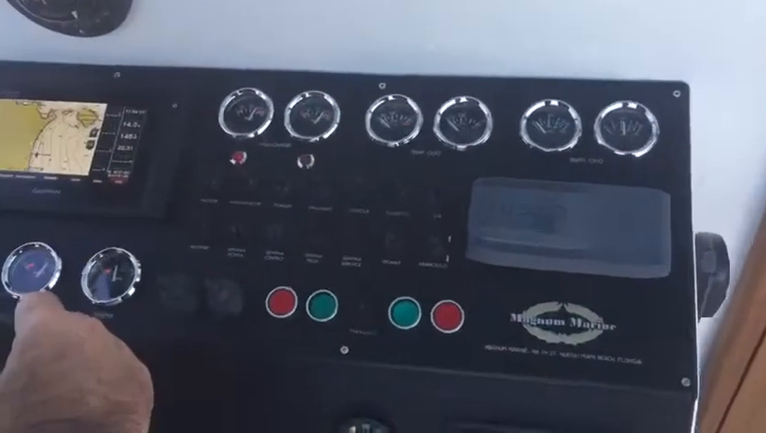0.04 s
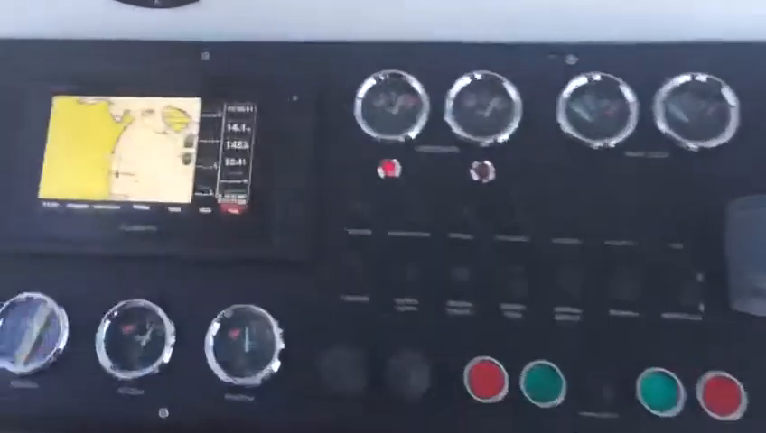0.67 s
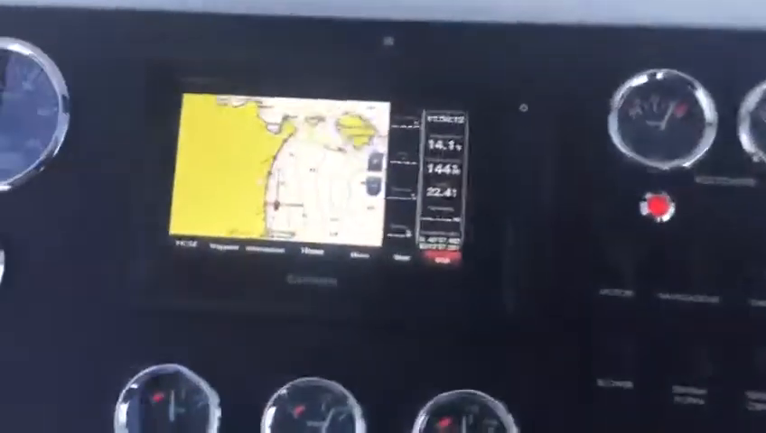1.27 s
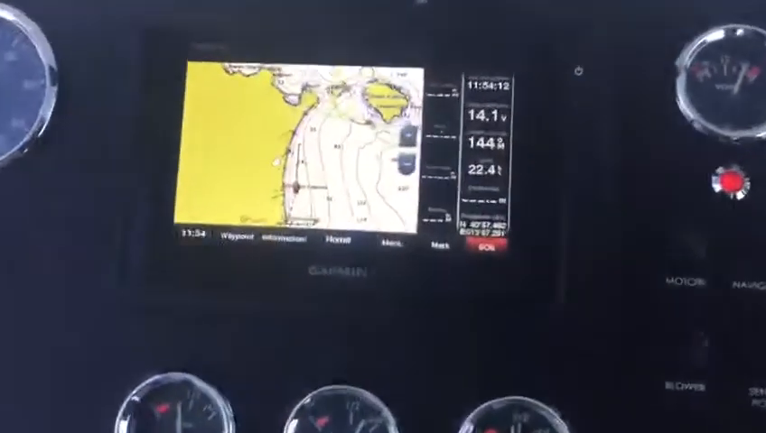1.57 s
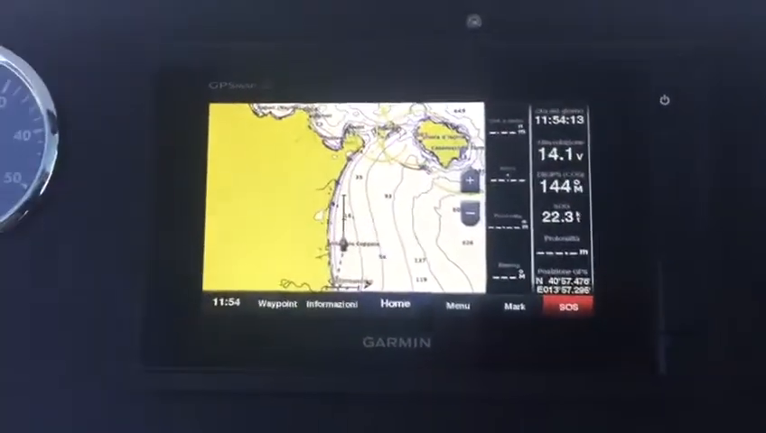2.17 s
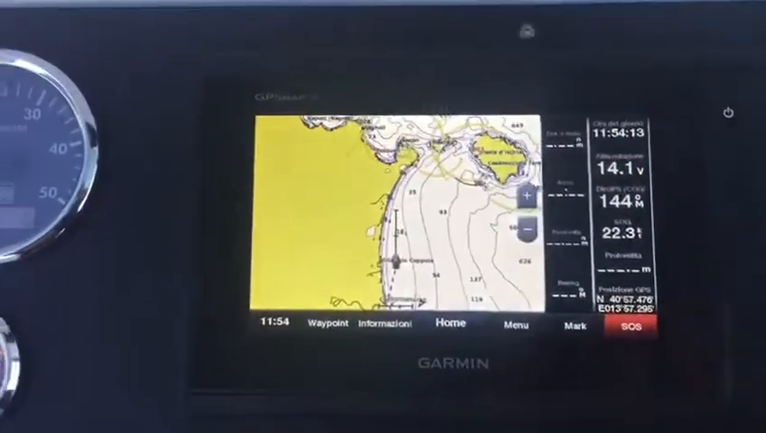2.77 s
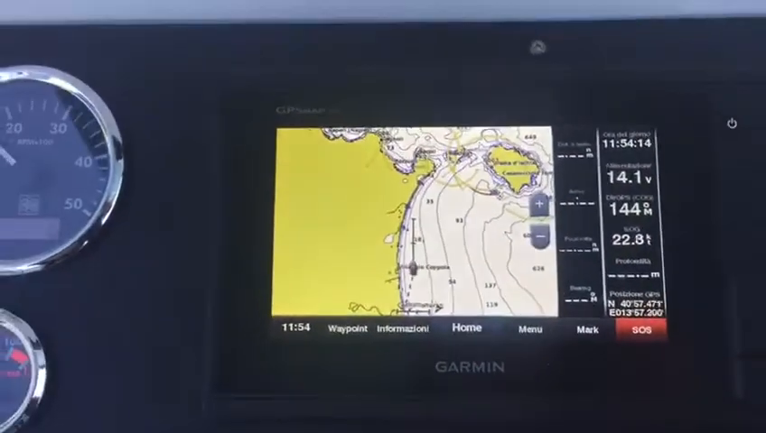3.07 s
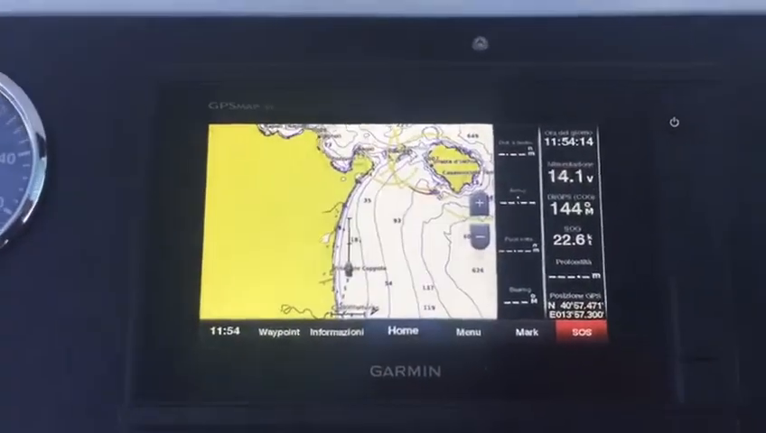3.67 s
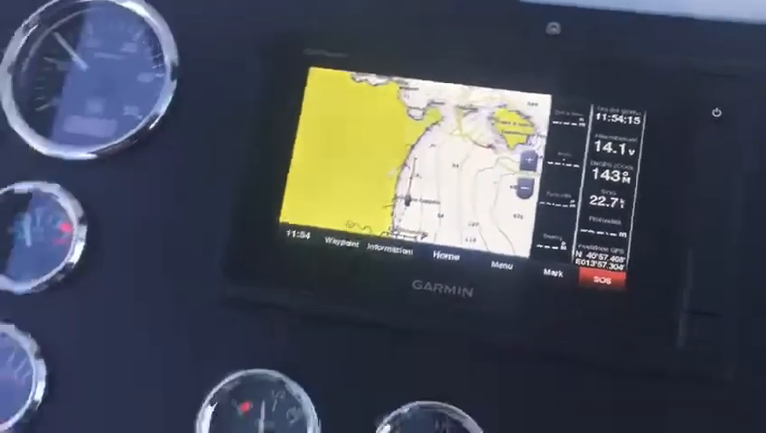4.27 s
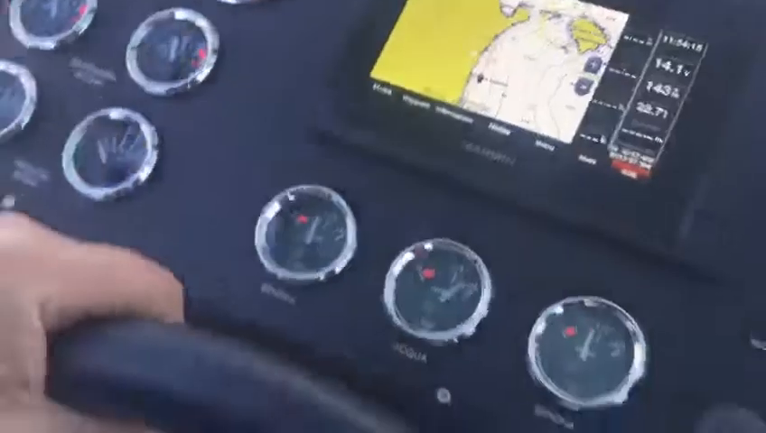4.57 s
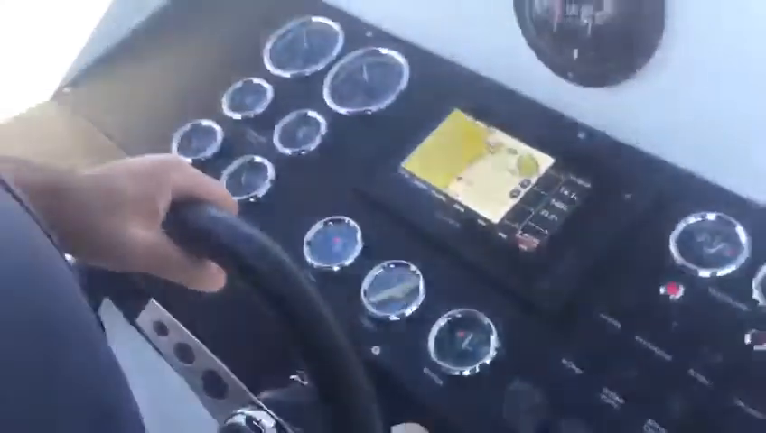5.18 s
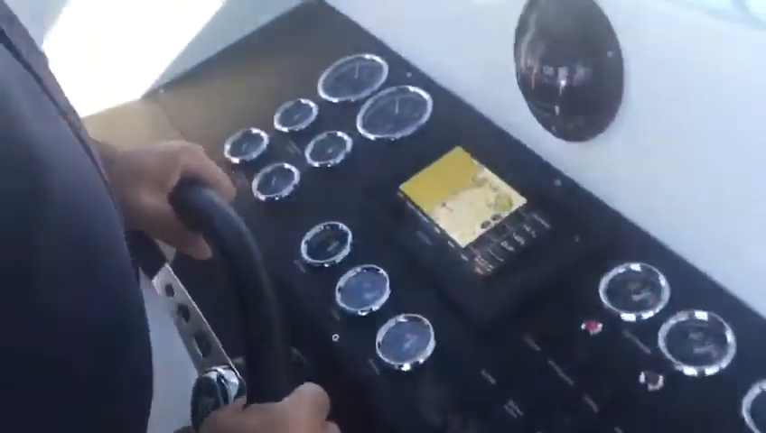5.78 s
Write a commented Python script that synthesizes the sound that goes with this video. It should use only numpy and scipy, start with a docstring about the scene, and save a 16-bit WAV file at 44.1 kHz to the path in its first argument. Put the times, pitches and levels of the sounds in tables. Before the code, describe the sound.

Heard from the helm of a cruising powerboat, two engines drone steadily and slightly out of step, with a low propeller throb and a high, wavering gear whine. Wind and spray hiss over the rumbling hull. After about a second the growl draws back and the exhaust note swells three times; near the end the growl comes forward again.

```python
"""A twin-engined powerboat cruises at about 3000 rpm, heard at the helm. From the start, propeller
blades thump the hull, reduction gears whine and two V8 exhausts drone slightly out of step over
water and wind. After a second the engine growl draws back and the exhausts surge three times,
while a long wave swells the hull's rumble. Around 4 s the engines drift nearly into step; then
their drone stands out, and near the end the thump dips twice as the growl comes forward again."""
import sys
import numpy as np
from scipy import signal
from scipy.fft import rfft, irfft, next_fast_len
from scipy.io import wavfile
from scipy.ndimage import uniform_filter1d, map_coordinates

SR = 44100
rng = np.random.default_rng(int(sys.argv[2]) if len(sys.argv) > 2 else 0)


def master(y):
    """Save y as 16-bit WAV."""
    cut = np.clip(np.atleast_2d(y).T, -1, 1)
    pcm = np.round(cut * 32767)  # scale
    wavfile.write(sys.argv[1], SR, pcm.astype(np.int16))


N = 257544
PINION_TEETH, WHEEL_TEETH, CYLINDERS = 17, 33, 8

# The engine growl's fader, lower while the listener shelters close to the dashboard.
# Each row: time in seconds, level in dB.
GROWL_FADER = [(0, -27.5), (.25, -26.5), (.7, -29.5), (1.15, -35), (2.6, -34.5), (3.4, -40), (4.2, -35.5),
               (4.85, -37), (5.25, -35), (5.55, -29), (5.84, -31.5)]


def propellers(crank):
    """Each blade passing under the hull pushes on it; unequal blades add other shaft orders."""
    # The thump's slow swell and sag. Each row: time in seconds, level in dB.
    thump_fader = [(0, -15), (.36, -13), (1.1, -12.5), (1.5, -15.5), (2.3, -18), (2.6, -12), (3.6, -14),
                   (4.0, -13), (5.0, -16), (5.84, -16)]
    # Brief dips in the thump. Each row: centre in seconds, half width in seconds, depth in dB.
    thump_dips = [(.17, 0.056, 3), (1.9, 0.07, 5.5), (5.3, 0.056, 8), (5.5, 0.028, 10)]
    # Partials of a three-blade propeller. Each row: multiple of the shaft rate, relative level in dB.
    partials = [(2, -23), (3, -0.5), (4, -22), (6, -22), (7, -30.5)]
    thump_db, = curves(thump_fader)
    shaft = crank * PINION_TEETH / WHEEL_TEETH
    thump = sum(amp(db) * twin(shaft, order, far_db=-21) for order, db in partials)
    return amp(thump_db + 0.47 * wobble(12)) * fades(thump_dips) * thump


def gears(crank):
    """Meshing teeth whine; both gears sound in the overtones, which flutter as their speeds differ."""
    # Faders for the first three mesh harmonics. Each row: time in seconds, level in dB.
    mesh_fader = [(0, -19.5), (.5, -23), (.74, -25), (.86, -19.5), (1.0, -16.5), (1.25, -22.5), (2.5, -23),
                  (3.2, -27), (3.85, -24.3), (4.45, -25.5), (4.76, -20), (5.4, -22.5), (5.58, -17.5),
                  (5.84, -18.5)]
    second_fader = [(0, -36), (.2, -30), (.45, -39.5), (.75, -36), (1.03, -45), (1.3, -36), (1.62, -34),
                    (1.8, -45), (2.6, -35), (3.3, -34.5), (4.15, -38.5), (4.45, -43), (4.85, -35.5),
                    (5.4, -36.5), (5.84, -40)]
    third_fader = [(0, -45), (.8, -41.5), (1.55, -50), (2.25, -38.5), (2.9, -42), (3.2, -46), (5.0, -48),
                   (5.45, -39), (5.84, -48)]
    # The fundamental drops out as the listener moves through nulls of its standing wave.
    # Each row: centre in seconds, half width in seconds, depth in dB.
    nulls = [(.08, 0.073, 16), (.3, 0.054, 8), (.59, .055, 22), (3.38, 0.035, 18), (3.65, 0.05, 18),
             (4.15, 0.035, 6), (4.9, 0.096, 13), (5.27, .05, 5.5), (5.365, .015, 13)]
    (mesh_db,), (second_db,), (third_db,) = curves(mesh_fader), curves(second_fader), curves(third_fader)
    torque_ripple = 0.02 * np.array([wobble(60), wobble(60)])  # shakes the pitch
    near, far = teeth = crank * PINION_TEETH + torque_ripple
    # the wheel's runout swells the whine once a turn
    runout = 1 + 0.039 * tone(near / WHEEL_TEETH) + 0.047 * wobble(60)
    whine = amp(mesh_db + 0.4 * wobble(15)) * fades(nulls) * twin(teeth, order=1, far_db=-17.5)
    whine += amp(second_db) * twin(teeth, order=2, far_db=9.5)
    whine += amp(third_db) * twin(teeth, order=3, far_db=-1)
    whine += amp(-53) * twin(teeth, order=4, far_db=4)
    whine += amp(-53.5 + 1.5 * wobble(3.3)) * twin(teeth, order=6, far_db=3)
    # a rough fringe surrounds the tone and is bared where the tone itself fades
    fringe = unit(wobble(110) * tone(near) + wobble(110) * tone(far))
    return whine * runout + amp(-37.5) * fringe


def exhausts(crank):
    """Uneven firing in each bank sounds a stack of low partials; waves over the outlets make them waver."""
    # Surges of the firing note. Each row: time in seconds, level in dB.
    firing_fader = [(0, -26), (1.05, -27.5), (1.42, -18.5), (1.9, -26.5), (2.45, -20), (2.78, -27),
                    (3.25, -20), (3.75, -26.5), (4.4, -22), (4.9, -22.5), (5.25, -31.5), (5.84, -27.5)]
    # Fades of the sixth order. Each row: centre in seconds, half width in seconds, depth in dB.
    sixth_fades = [(1.2, 0.29, 19), (2.52, 0.13, 17), (4.1, 0.6, 16), (5.53, 0.089, 23)]
    # The rest of the boom. Each row: multiple of the four-stroke cycle rate, relative level in dB.
    partials = [(2, -37.5), (4, -26.5), (5, -32), (7, -29.5), (9, -42), (10, -39.5), (11, -38), (12, -39.5),
                (13, -42), (14, -48), (15, -43), (16, -44)]
    firing_db, = curves(firing_fader)
    cycle = crank / 2  # four strokes take two turns
    sixth = amp(-24 + 0.73 * wobble(9)) * fades(sixth_fades) * twin(cycle, order=6, far_db=-14.5)
    firing = amp(firing_db + 0.54 * wobble(8)) * twin(cycle, order=CYLINDERS, far_db=-17.5)
    boom = sum(amp(db + 0.1 + 0.68 * wobble(3)) * twin(cycle, order, far_db=-9.5)
               for order, db in partials)
    return sixth + firing + boom


def engine_bay(crank):
    """The engine bay growls with high firing orders, the roar of the intakes and clatter."""
    # The drone's partials. Each row: multiple of the four-stroke cycle rate, relative level in dB.
    partials = [(20, -16), (22, -10), (23, -17), (24, -6.5), (25, -15), (26, -15), (27, -15), (28, -15),
                (30, -16), (31, -18)]
    # The throaty colour of the intakes. Each row: frequency in Hz, relative level in dB.
    intake_eq = [(250, -40), (450, -3.5), (600, -3), (800, 0), (1400, -10), (4000, -34)]
    growl_db, = curves(GROWL_FADER)
    drone_db = -0.5 + 7 * bell(4.8, width=0.47)  # stands out as the listener turns from the dashboard
    drone = sum(amp(db + drone_db + wobble(3.6)) * twin(crank / 2, order, far_db=-13)
                for order, db in partials)
    intake = amp(-4) * coloured(rng.standard_normal(N), intake_eq)
    clatter_db = 0.5 * growl_db - 17  # partly comes through the deck, so shelter dims it half as much
    return amp(growl_db) * (drone + intake) + amp(clatter_db) * clatter(crank)


def clatter(crank):
    """Each firing knocks the block, every cylinder with its own strength and timing; rms 1."""
    # The midrange colour of the knocks. Each row: frequency in Hz, relative level in dB.
    clatter_eq = [(300, -30), (450, -1), (650, -2), (950, 0), (1450, -1), (1550, -6), (1650, -1),
                  (2200, -10), (4000, -22), (9000, -40)]
    knocks = np.zeros(N)
    for turns, engine_db in zip(crank, (0, -4)):
        firings = turns * CYLINDERS / 2
        count = np.arange(1, int(firings[-1]))
        strength, lag = rng.standard_normal((2, CYLINDERS))[:, count % CYLINDERS]
        scatter, jitter = rng.standard_normal((2, len(count)))
        onsets = np.interp(count + 0.15 * lag + 0.028 * jitter, firings, np.arange(N)).astype(int)
        knocks += np.bincount(onsets, amp(engine_db + 2 * strength + 1.5 * scatter), N)
    t = np.arange(SR // 8) / SR
    bay_reverb = rng.standard_normal(len(t)) * amp(-60 * t / 0.13)  # blurs the knocks into a buzz
    return coloured(signal.fftconvolve(knocks, bay_reverb)[:N], clatter_eq)


def hull():
    """The hull rumbles through the water; each wave swells it and draws out a hollow note."""
    # Waves against the hull. Each row: centre in seconds, half width in seconds, rise in dB.
    waves = [(.28, .13, 3), (.98, 0.12, 3), (2.3, 0.49, 3.3), (4.45, .3, 1.5), (5.65, .15, 2.5)]
    # Colours of the rumble and the hollow note. Each row: frequency in Hz, relative level in dB.
    rumble_eq = [(15, -26), (30, -14), (45, -19), (62, -1.5), (110, -4), (165, -1), (215, -5.5), (310, -11),
                 (450, -15), (800, -26.5), (2000, -47)]
    hollow_eq = [(200, -30), (275, -8), (310, 2), (345, -3), (430, -33.5)]
    swell_db = sum(rise_db * bell(centre, width) for centre, width, rise_db in waves)
    rumble = amp(-26 + swell_db) * coloured(patchy_noise(patchy_db=0.5), rumble_eq)
    hollow = amp(-28) * (amp(swell_db) - 1) * coloured(rng.standard_normal(N), hollow_eq)
    return rumble + hollow


def spray():
    """Wind and spray hiss past the cockpit, a little softer in the dashboard's shelter."""
    # The broad colour of the hiss. Each row: frequency in Hz, relative level in dB.
    spray_eq = [(200, -19), (600, -1.5), (1000, -2), (1550, -2), (1900, -1.5), (2300, -4), (4400, -10.5),
                (4950, -14), (5300, -11.5), (6800, -14), (7600, -18), (8400, -15.5), (9800, -18),
                (10500, -22.5), (11000, -24.5)]
    growl_db, = curves(GROWL_FADER)
    shelter_db = 0.19 * (growl_db - growl_db.mean())
    return amp(-30 + shelter_db + 0.32 * wobble(12)) * coloured(patchy_noise(patchy_db=1.3), spray_eq)


def twin(turns, order, far_db):
    """The same partial from the near and far drives, at rms 1: it beats as their speeds differ."""
    near, far = turns
    return unit(tone(order * near) + amp(far_db) * tone(order * far))


def tone(cycles):
    """A sine of rms 1 that follows a running count of cycles."""
    return np.sqrt(2) * np.sin(2 * np.pi * (cycles + rng.random()))


def patchy_noise(patchy_db):
    """White noise with patches of random gain in time and frequency."""
    spectra = signal.stft(rng.standard_normal(N), nperseg=512)[2]
    patches = uniform_filter1d(rng.standard_normal(spectra.shape), size=8, axis=0)
    patches = uniform_filter1d(patches, size=16, axis=1)
    return signal.istft(spectra * amp(patchy_db * unit(patches)), nperseg=512)[1][:N]


def coloured(x, eq):
    """x through an EQ of (Hz, dB) points on a log axis, at rms 1."""
    points_hz, db = np.transpose(eq)
    return unit(filtered(x, lambda hz: amp(np.interp(np.log(hz + 1), np.log(points_hz), db))))


def filtered(x, response):
    """x through a filter whose gain is response(Hz)."""
    size = next_fast_len(N + SR // 2)
    return irfft(rfft(x, size) * response(np.fft.rfftfreq(size, 1 / SR)), size)[:N]


def curves(rows):
    """One value per sample for each column after the time."""
    times, *columns = np.transpose(rows)
    return [np.interp(np.arange(N) / SR, times, column) for column in columns]


def wobble(rate):
    """A smooth random curve, rate knots a second."""
    return map_coordinates(rng.standard_normal(int(N * rate / SR) + 4), [np.arange(N) * rate / SR])


def fades(rows):
    """A gain of 1 that sinks smoothly at each (centre, half width, depth in dB)."""
    return np.prod([1 - (1 - amp(-db)) * bell(centre, width) for centre, width, db in rows], axis=0)


def bell(centre, width):
    """A smooth bump of height 1; centre and half width in seconds."""
    return np.exp(-((np.arange(N) / SR - centre) / width) ** 2)


def amp(db):
    return 10 ** (np.asarray(db) / 20)


def unit(x):
    """x at rms 1."""
    return x / np.sqrt(np.mean(x ** 2) + 1e-20)


def scene():
    """Two crankshafts drive all the machinery, over a bed of water and wind; mono."""
    # Crankshaft speeds. Each row: time in seconds, near and far engine in turns per second.
    speeds = [(0.0, 50.47, 50.29), (0.3, 50.51, 50.26), (0.7, 50.47, 50.06), (1.1, 50.42, 50.18),
              (1.4, 50.39, 50.08), (2.1, 50.37, 50.12), (2.7, 50.36, 50.0), (3.1, 50.38, 50.12),
              (3.6, 50.38, 50.19), (4.0, 50.44, 50.38), (4.5, 50.41, 50.46), (5.0, 50.58, 50.62),
              (5.3, 50.55, 50.53), (5.6, 50.51, 50.59), (5.84, 50.44, 50.47)]
    crank = np.cumsum(curves(speeds), axis=1) / SR  # turns of each crankshaft
    return (propellers(crank) + exhausts(crank) + engine_bay(crank) + gears(crank) + hull() + spray())[None]


def record(dry):
    """A steep low-pass takes off the top of the treble."""
    cutoff_hz = 11750
    return filtered(dry[0], lambda hz: 1 / np.sqrt(1 + (hz / cutoff_hz) ** 200))[None]


dry = scene()
out = record(dry)
master(out)
```